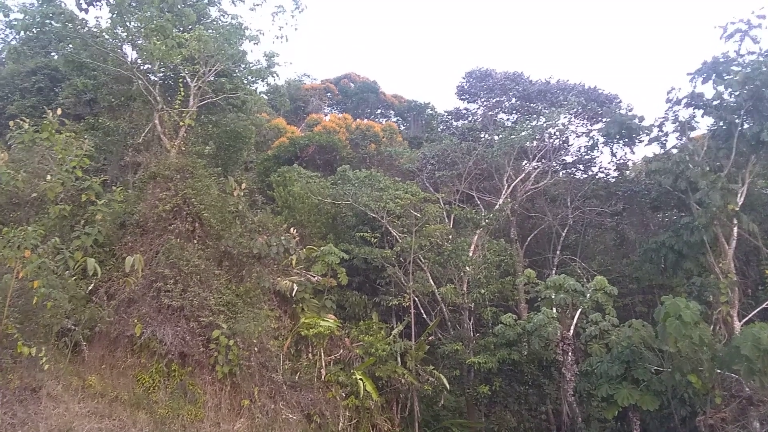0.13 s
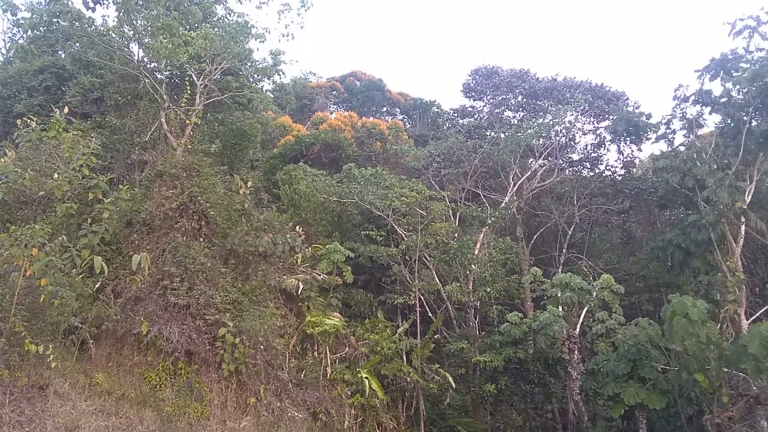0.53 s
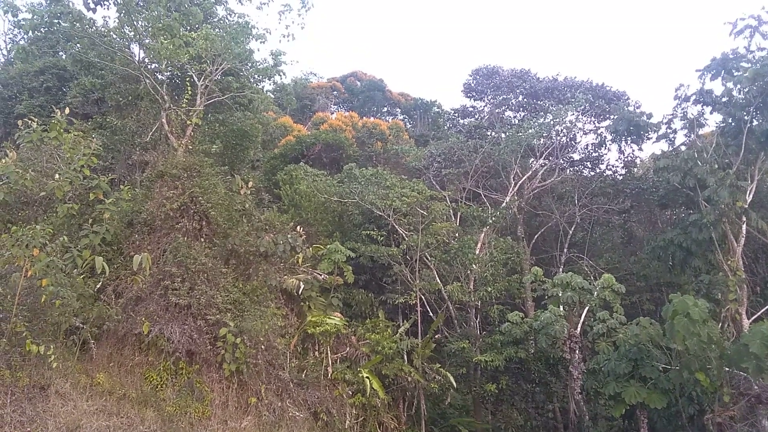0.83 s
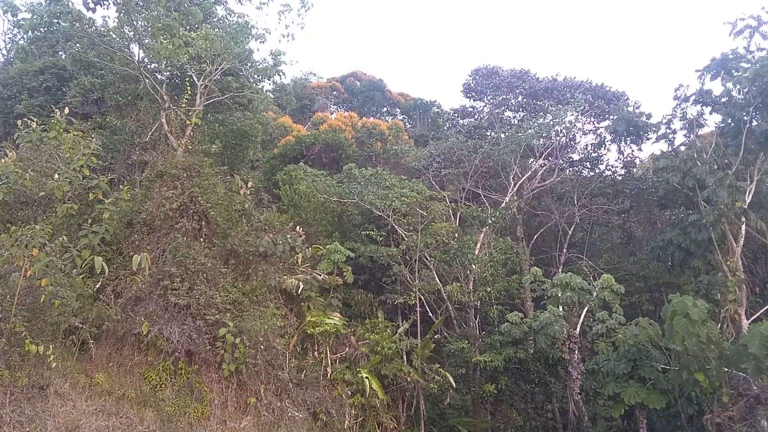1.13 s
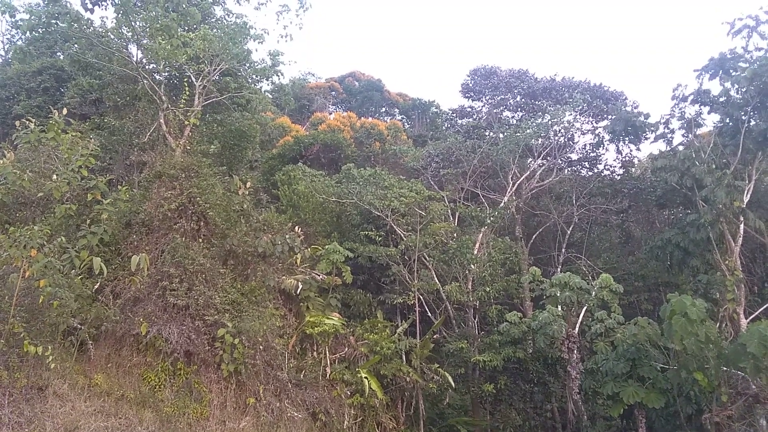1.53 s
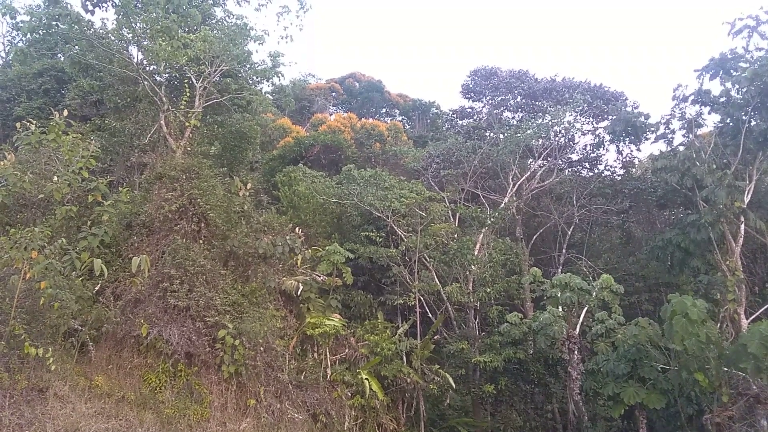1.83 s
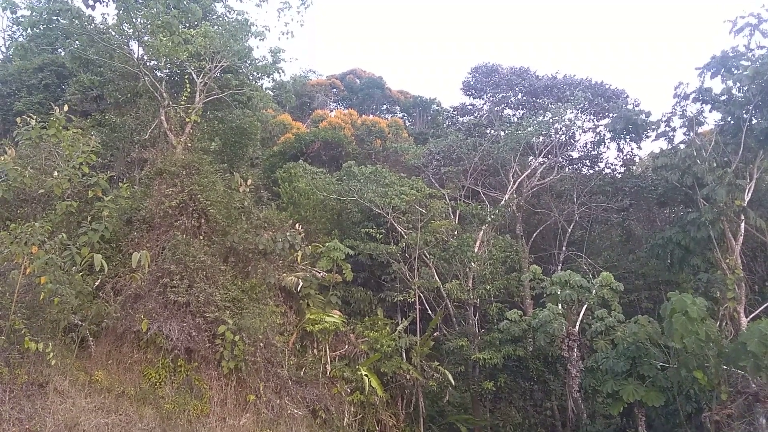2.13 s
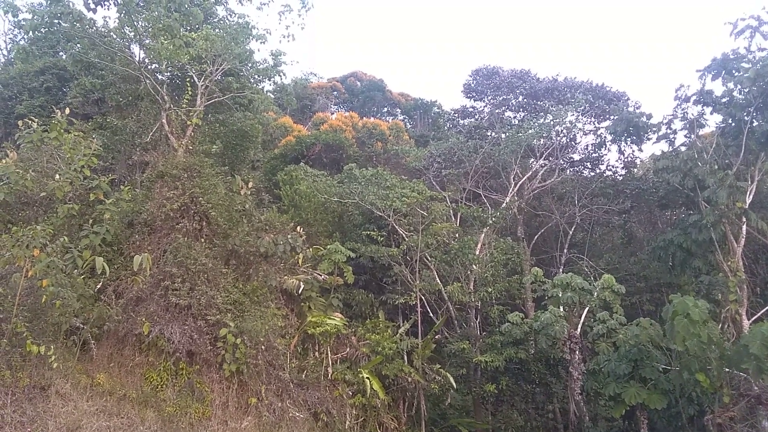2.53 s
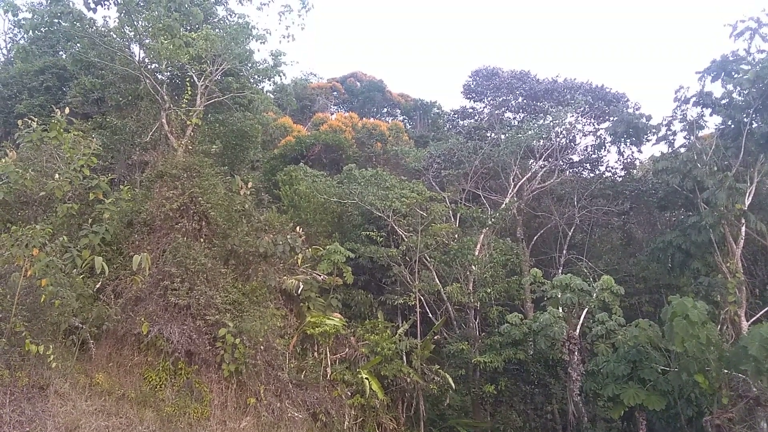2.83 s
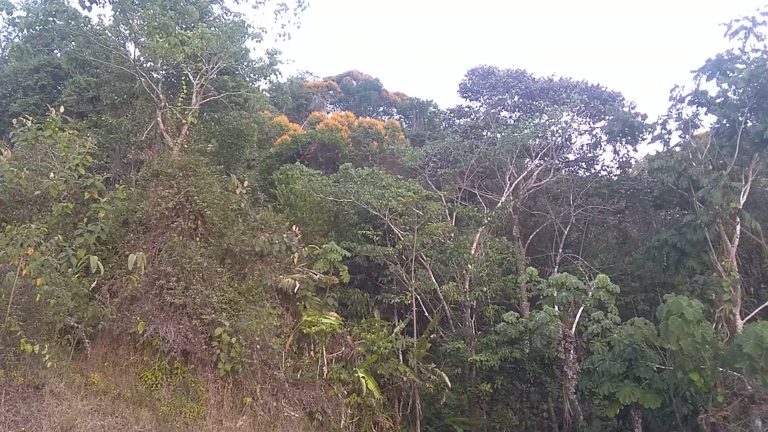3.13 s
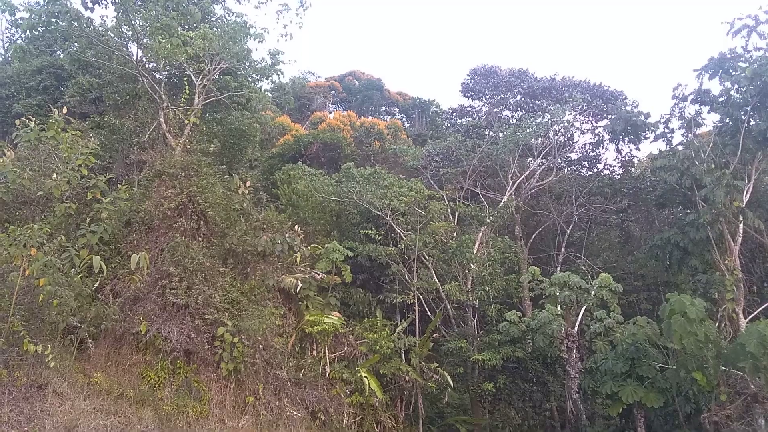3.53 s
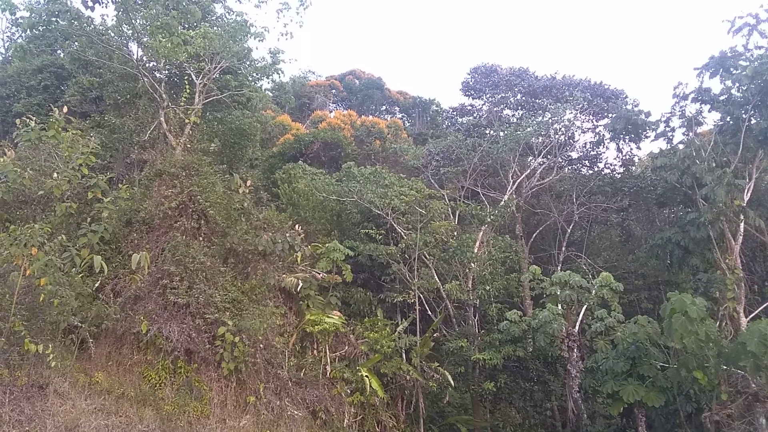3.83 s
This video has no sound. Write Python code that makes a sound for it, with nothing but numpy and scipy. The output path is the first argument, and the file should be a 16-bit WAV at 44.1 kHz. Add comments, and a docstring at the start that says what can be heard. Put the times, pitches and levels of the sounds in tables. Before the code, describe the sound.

Distant howler monkey's rasping roar and hoot fade into rhythmic panting grunts over pulsing insect hiss

```python
"""A forest gully with howler monkeys: a long rasping roar, hoarse moans and a clear hoot die away while
another animal pants out and in, softer towards the end. Rough pulses ring throat bands; hoot and bird are sines.
A cicada chorus of shaped noise hisses, its buzz sinking to a darker tone about every three quarters of
a second; a far bird pipes near the end. Two microphone ports, cross-fed for width."""
import sys
import numpy as np
from scipy import signal
from scipy.fft import rfft, irfft, next_fast_len
from scipy.io import wavfile
from scipy.ndimage import uniform_filter1d

SR = 44100
rng = np.random.default_rng(int(sys.argv[2]) if len(sys.argv) > 2 else 0)


def put_to_file(sound):
    """Save the sound as 16-bit audio at rate SR, in the file named by the first command-line argument."""
    columns = np.atleast_2d(sound).T  # one column per channel
    safe = np.clip(columns, -1, 1)
    whole_steps = np.round(safe * 32767)
    wavfile.write(sys.argv[1], SR, whole_steps.astype(np.int16))


N = 176400  # samples, 4 s


def amp(db):
    """Decibels to amplitude."""
    return 10 ** (np.asarray(db) / 20)


def evened(x):
    """Scale to unit RMS."""
    return x / np.sqrt(np.mean(x ** 2) + 1e-20)


def read(points, hz):
    """Read a spectral curve along a logarithmic frequency axis."""
    point_hz, value = np.transpose(points)
    return np.interp(np.log(hz + 1), np.log(point_hz + 1), value)


def band(x, hz, width_hz):
    """A steep resonance that follows the curve hz: shift down, smooth with two equal poles, shift back."""
    turn = np.exp(2j * np.pi * np.cumsum(hz * np.ones(len(x))) / SR)
    r = np.exp(-np.pi * width_hz / SR)
    two_poles = np.convolve([1, -r], [1, -r])
    ringing = turn * signal.lfilter([1], two_poles, x / turn)
    return evened(ringing.real)


def folds(pulse_hz, rough):
    """Uneven slaps of the vocal folds, each of its own size, with a puff of air; rough is the puff share."""
    drift_db = 3.5 * evened(uniform_filter1d(rng.standard_normal(N), 500))
    turns = np.cumsum(pulse_hz * amp(drift_db)) / SR
    slaps = np.diff(np.floor(turns), prepend=0) * amp(3 * rng.standard_normal(N))
    puffs = (0.17 + np.exp(-(turns % 1) / 0.49)) * rng.standard_normal(N)
    return (1 - rough) * evened(slaps) + rough * evened(puffs)


def waver():
    """Quick random drift of unit size: noise smoothed twice."""
    smooth = uniform_filter1d(rng.standard_normal(N), 900)
    return evened(uniform_filter1d(smooth, 900))


def gate(start_s, length_s, edge_s):
    """Rises over the edge, holds, falls in an edge centred on the end; sounds from time zero begin fully up."""
    t = np.arange(N) / SR - start_s
    rise = t / edge_s + (start_s < .005)
    fall = (length_s - t) / edge_s + .5
    return np.clip(np.minimum(rise, fall), 0, 1)


ROAR_PULSE_HZ, ROAR_ROUGH = 70, .85  # pulse rate before its drift, share of puffs
ROAR_LOW_HZ, ROAR_SAG_HZ_PER_S = 433.3, 34.3  # low throat band, sinking steadily
ROAR_LOW_WIDTH_HZ, ROAR_HIGH_WIDTH_HZ = 56, 78  # of each pole
ROAR_WANDER = .008  # throat bands waver by this share
# Highest band, in the first burst only; its level is relative to the second throat band
RASP_TOP_HZ, RASP_TOP_WIDTH_HZ, RASP_TOP_DB = 2190, 160, -10.5
# Roar's two throat bands over time: start_s, low_level_db, high_level_db, high_band_hz
ROAR_THROAT = [(0, -29.5, -37, 890), (.125, -36.5, -42, 913), (0.154, -45, -46.5, 892),
               (.235, -44, -49, 926), (.26, -35.5, -42, 920), (0.381, -35, -36.5, 865),
               (0.581, -37.5, -42.5, 845), (.63, -43, -57.5, 863), (.72, -36, -45, 847),
               (.848, -33, -44.5, 802), (.88, -57.5, -55, 940), (.988, -39, -47, 780),
               (1.13, -47, -55, 910), (1.197, -36, -48, 913), (1.36, -58, -59.5, 840)]
# Side bands that roughen the roar: band_hz, width_hz, level_db (relative to the effort)
ROAR_SIDES = [(293, 84, -30.5), (537, 50, -14.5), (695, 104, -18), (1248, 250, -26)]


def roar():
    """Rough pulses ring the two bands of the hollow throat and weaker side bands; returns voice and top rasp."""
    s, low_db, high_db, high_hz = np.transpose(ROAR_THROAT)
    t = np.arange(N) / SR
    drive = folds(ROAR_PULSE_HZ, ROAR_ROUGH)
    low, high = amp(np.interp(t, s, low_db)), amp(np.interp(t, s, high_db))
    sides = sum(amp(db) * band(drive, hz, width) for hz, width, db in ROAR_SIDES)
    low_curve = (ROAR_LOW_HZ - ROAR_SAG_HZ_PER_S * t) * (1 + ROAR_WANDER * waver())
    high_curve = np.interp(t, s, high_hz) * (1 + ROAR_WANDER * waver())
    voice = low * band(drive, low_curve, ROAR_LOW_WIDTH_HZ)
    voice = voice - high * band(drive, high_curve, ROAR_HIGH_WIDTH_HZ)
    effort = uniform_filter1d(low + high, 2000)
    top_rasp = high * amp(RASP_TOP_DB) * band(drive, RASP_TOP_HZ, RASP_TOP_WIDTH_HZ)
    return gate(0, s[-1], 0.027) * (voice + effort * sides), gate(0, s[2], 0.048) * top_rasp


MOAN_SPREAD = .06  # breath band width as a share of the starting pitch
# Breathy voiced moans: start_s, length_s, start_pitch_hz, end_pitch_hz, level_db
MOANS = [(0, 0.14, 210.3, 190, -47), (0.061, 0.2, 297.5, 272.2, -49.5), (0.151, 0.08, 937, 1022, -47.5),
         (0.575, 0.052, 886.4, 998, -45), (0.642, 0.036, 823, 831, -39.5), (0.645, 0.07, 1021, 1010, -50)]


def moans():
    """Gliding tones inside a hoarse band of breath."""
    t, air = np.arange(N) / SR, rng.standard_normal(N)
    out = np.zeros(N)
    for s, length, start_hz, end_hz, db in MOANS:
        hz = np.interp(t, [s, s + length], [start_hz, end_hz])
        tone = np.sin(2 * np.pi * np.cumsum(hz) / SR)
        breath = band(air, hz, MOAN_SPREAD * start_hz)
        out += gate(s, length, 0.014) * amp(db) * evened(tone + breath)
    return out


def stroke(rows):
    """Table row of the current stroke, and progress through it from +.5 to -.5."""
    rows, t = np.array(rows), np.arange(N) / SR
    k = np.searchsorted(rows[:, 0], t, "right") - 1
    k_rows = rows[k]
    return k_rows, .5 - np.clip((t - k_rows[:, 0]) / k_rows[:, 1], 0, 1)


PANT_PULSE_HZ, PANT_ROUGH, PANT_EDGE_S = 86.2, .7, .036  # pulse rate before its drift, share of puffs, edge
OUT_GLIDE, IN_GLIDE = .18, .26  # slide through a stroke as a share, before each band's exponent
OUT_BENDS = (-1.1, .4, -.25)  # exponents of the slide: low band rises, middle falls, nasal rises slightly
IN_WIDTH_HZ = 40
IN_UPPER_HZ, IN_UPPER_WIDTH_HZ, IN_UPPER_DB = 870, 65, -9  # level relative to the low band
# Panting out: start_s, length_s, level_db, nasal_db (added to the nasal band)
OUT_STROKES = [(0, 0.15, -53, 9), (0.261, 0.23, -44.5, 3), (0.633, 0.16, -47, -0.5), (0.964, 0.16, -46, -5),
               (1.158, 0.12, -43, -12), (1.394, .11, -44.5, -9.5), (1.595, 0.086, -45, -7.5),
               (1.806, 0.1, -45, -14.5), (1.976, 0.11, -46, -17), (2.159, 0.12, -48.5, -10.5),
               (2.35, 0.11, -51, -15), (2.593, 0.068, -49, -20)]
# Throat on the out-stroke, low, middle and nasal: mid_stroke_hz, width_hz, level_db
OUT_THROAT = [(385, 95, 0), (675, 70, -6), (1385, 60, -11)]
# Panting in: start_s, length_s, level_db, low_band_hz (at mid-stroke)
IN_STROKES = [(0.507, 0.2, -52.5, 277), (0.867, 0.11, -50, 294), (1.096, 0.07, -48.5, 275),
              (1.33, 0.085, -54, 276), (1.526, 0.064, -46.5, 262), (1.707, 0.094, -49.5, 250),
              (1.915, 0.055, -47, 254), (2.104, 0.065, -50, 237), (2.29, 0.062, -49, 245),
              (2.491, 0.068, -51, 217)]
# Low growl that joins the strokes: time_s, level_db
GROWL = [(1.2, -54), (2.52, -57.5), (2.78, -63)]
# Throat of the growl: band_hz, width_hz, level_db (relative to the growl level)
GROWL_THROAT = [(324, 142, 4.5), (516, 244, -4.5), (781, 276, -5.5)]


def panting():
    """Grunts whose low band rises on the out-stroke, hollower falling ones on the in-stroke, and a growl."""
    drive, t = folds(PANT_PULSE_HZ, PANT_ROUGH), np.arange(N) / SR
    slide = 1 + OUT_GLIDE * stroke(OUT_STROKES)[1]
    low, mid, nasal = (amp(db) * band(drive, hz * slide ** bend, width)
                       for bend, (hz, width, db) in zip(OUT_BENDS, OUT_THROAT))
    out = sum(gate(s, length, PANT_EDGE_S) * amp(db) * (low - mid + amp(nasal_db) * nasal)
              for s, length, db, nasal_db in OUT_STROKES)

    row, progress = stroke(IN_STROKES)
    slide = 1 + IN_GLIDE * progress
    hollow = band(drive, row[:, 3] * slide, IN_WIDTH_HZ)
    hollow = hollow + amp(IN_UPPER_DB) * band(drive, IN_UPPER_HZ * slide ** 0.26, IN_UPPER_WIDTH_HZ)
    back = hollow * sum(gate(s, length, PANT_EDGE_S) * amp(db) for s, length, db, _ in IN_STROKES)

    s, level_db = np.transpose(GROWL)
    growl = sum((-1) ** k * amp(db) * band(drive, hz, width)  # neighbouring bands in opposite polarity
                for k, (hz, width, db) in enumerate(GROWL_THROAT))
    growl = growl * gate(s[0], s[-1] - s[0], 0.081) * amp(np.interp(t, s, level_db))
    return out + growl + back


SINK_S, LIFT_S = .13, 0.1  # time scales into and out of each sinking
DARK_LINGER = 1.03  # the low buzz lifts more slowly by this factor
RIGHT_SINK = .55  # share of the treble's sinking heard at the right port
# The air's low wash: band_hz, level_db
AIR = [(80, -36), (200, -43), (350, -41), (600, -49.5), (1200, -60), (1600, -55.5), (2000, -68.5),
       (2600, -57.5)]
# Cicada buzz when up: band_hz, level_db
BRIGHT_BUZZ = [(2200, -64), (2900, -58.5), (3500, -44.5), (4200, -44), (5600, -44.5), (6900, -49),
               (8600, -41.5), (12300, -41.5), (13300, -44.5), (14300, -55)]
# Cicada buzz when sunk: band_hz, level_db
DARK_BUZZ = [(2200, -61.5), (2900, -53.5), (3500, -43), (4200, -34.5), (4900, -39), (5400, -45),
             (5620, -34), (5850, -45), (6300, -45), (8600, -45.5), (12300, -46.5), (13300, -54.5),
             (14300, -54)]
# Right port against left, for buzz and air: band_hz, gain_db
RIGHT_TILT = [(100, -4), (3000, -5), (7000, -0.5), (9500, -5), (12500, -7.5)]
# Deepest moment of each sinking: time_s
SINKS = [.61, 1.41, 2.199, 2.96, 3.71]


def chorus():
    """Cicada hiss: noise shaped from a bright to a dark buzz at each sinking, over the air's low wash."""
    hz, t, z = signal.stft(rng.standard_normal((2, N)), SR, nperseg=512, noverlap=384)
    low = (hz < 6800)[:, None]
    lift_s = LIFT_S * np.where(low, DARK_LINGER, 1)
    sunk = sum(np.exp(-abs((t - s) / np.where(t < s, SINK_S, lift_s)) ** 3.5) for s in SINKS)
    sunk = np.array([sunk, sunk * np.where(low, 1, RIGHT_SINK)])  # left, right

    # Random level patches: slow ones smoothed over frequency and time, quick ones over frequency only
    patches = uniform_filter1d(rng.standard_normal((len(t), len(hz))).T, 8, 0)
    patches = evened(uniform_filter1d(patches, 20, 1))
    throb = evened(uniform_filter1d(rng.standard_normal((len(t), len(hz))).T, 30, 0))
    buzz_db = read(BRIGHT_BUZZ, hz)[:, None] * (1 - sunk) + read(DARK_BUZZ, hz)[:, None] * sunk
    buzz_db = buzz_db + .9 * patches + .8 * throb

    buzz = amp(buzz_db) * (hz > 1500)[:, None]
    wash = amp(read(AIR, hz))[:, None] * (hz < 4000)[:, None]
    ports = amp([0 * hz, read(RIGHT_TILT, hz)])[:, :, None]
    shaped = z * np.hypot(buzz, wash) * ports
    return signal.istft(shaped, SR, nperseg=512, noverlap=384)[1][:, :N]


HOOT_OCTAVE_DB = -16.5  # octave against the fundamental
HOOT_WAVER, HOOT_FLUTTER_DB = .003, 1.2  # random drift of pitch (share) and of level
# Path of the hoot: time_s, pitch_hz, level_db
HOOT = [(0.839, 475.3, -40.5), (0.877, 462.5, -33.5), (1.118, 456.3, -30), (1.15, 449.7, -41),
        (1.22, 460, -40), (1.248, 455.3, -28.5), (1.3, 425, -43.5)]


def hoot():
    """A clear, slightly unsteady tone with its octave."""
    s, hz, db = np.transpose(HOOT)
    t = np.arange(N) / SR
    pitch = np.interp(t, s, hz) * (1 + HOOT_WAVER * waver())
    turn = 2 * np.pi * np.cumsum(pitch) / SR
    level = amp(np.interp(t, s, db) + HOOT_FLUTTER_DB * waver())
    tone = np.sin(turn) + amp(HOOT_OCTAVE_DB) * np.sin(2 * turn)
    return gate(s[0], s[-1] - s[0], 0.005) * level * tone


# Piped notes: start_s, length_s, pitch_hz, level_db (before panning)
BIRD_NOTES = [(3.523, 0.05, 1675, -70), (3.567, 0.041, 1527, -61.5), (3.666, 0.028, 1760, -64.5),
              (3.713, 0.067, 1528, -66.5), (3.808, 0.028, 1550, -71)]


def bird():
    """Soft piped notes, each a steady sine."""
    t = np.arange(N) / SR
    return sum(gate(s, length, 0.0059) * amp(db) * np.sin(2 * np.pi * hz * t)
               for s, length, hz, db in BIRD_NOTES)


FOREST_T60_S, FOREST_RISE_S, FOREST_DB = .9, .03, -12  # decay, onset, level of the scatter
FOREST_SHARED = 0.53  # amplitude share of the tail noise common to both ports


def forest(x):
    """Scatter among trunks: a decaying tail of noise for each port."""
    t = np.arange(SR) / SR
    both, own = rng.standard_normal(SR), rng.standard_normal((2, SR))
    noise = FOREST_SHARED * both + np.sqrt(1 - FOREST_SHARED ** 2) * own
    tail = noise * amp(-60 * t / FOREST_T60_S) * np.minimum(t / FOREST_RISE_S, 1)
    return signal.fftconvolve(x[None], tail / np.linalg.norm(tail[0]), axes=1)[:, :N]


LEAD = 1  # samples by which the calls reach the left port first
HOOT_LEFT_DB = -4.5  # direct hoot in the left port, against the right


def scene():
    """Calls and bird placed in two ports, with forest scatter and the chorus around them."""
    voice, top_rasp = roar()
    clear = hoot()
    calls = voice + moans() + clear + panting()
    left = calls + top_rasp + (amp(HOOT_LEFT_DB) - 1) * clear
    right = np.pad(calls, (LEAD, 0))[:N]
    direct = np.array([left, right]) + bird() * amp([[-6.0], [3.0]])  # bird toward the right
    return direct + amp(FOREST_DB) * forest(direct.mean(0)) + chorus()


CROSS_DELAY = 21  # samples
LOW_CUT_HZ, EDGE_HZ = 80.4, 14270  # lower and upper band limits
# Cross-feed between the ports: band_hz, share
CROSS_FEED = [(40, 0.39), (300, 0.13), (1000, 0.79), (3200, 1), (4200, 0.37), (8500, 0.11)]


def record(dry):
    """Each port loses a delayed share of the other, which widens the picture; then the band limit."""
    size = next_fast_len(N + 64)
    hz = np.fft.rfftfreq(size, 1 / SR)
    feed = read(CROSS_FEED, hz) * np.exp(-2j * np.pi * hz * CROSS_DELAY / SR)
    wide = dry - irfft(rfft(dry[::-1], size) * feed, size)[:, :N]
    wide = signal.sosfilt(signal.butter(3, LOW_CUT_HZ, "high", fs=SR, output="sos"), wide)
    low_pass = signal.firwin(2047, EDGE_HZ, window=("kaiser", 12), fs=SR)
    return signal.oaconvolve(wide, low_pass[None], "same")


dry = scene()
out = record(dry)
put_to_file(out)
```